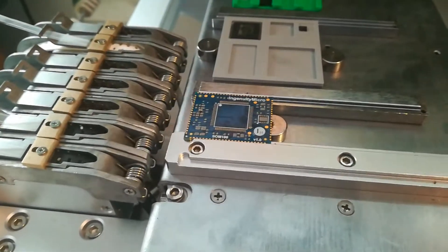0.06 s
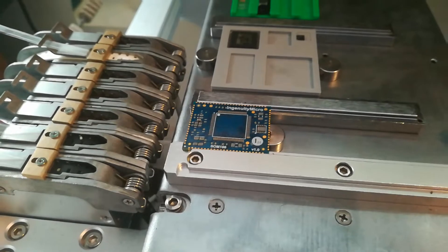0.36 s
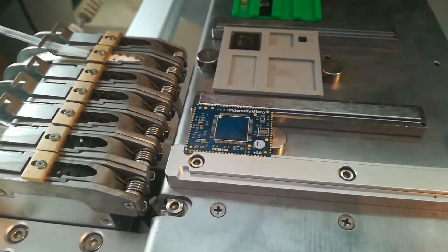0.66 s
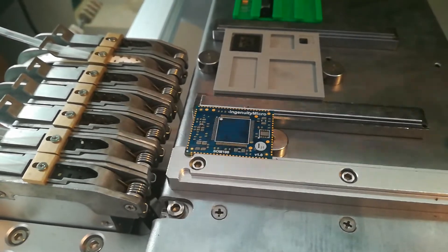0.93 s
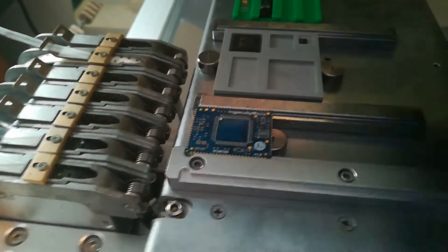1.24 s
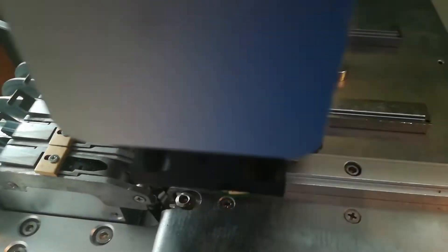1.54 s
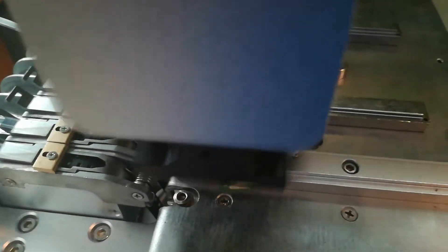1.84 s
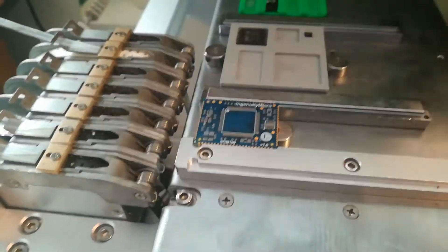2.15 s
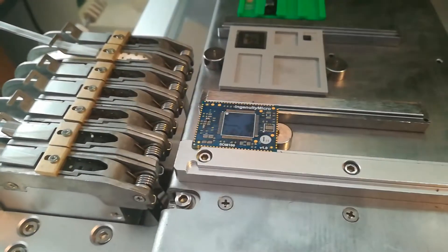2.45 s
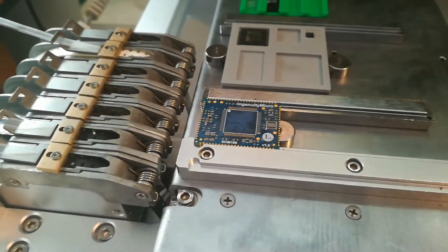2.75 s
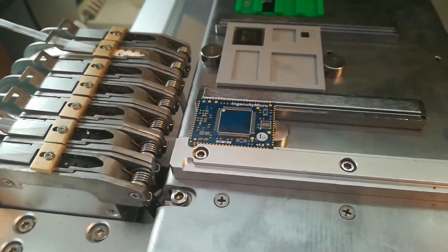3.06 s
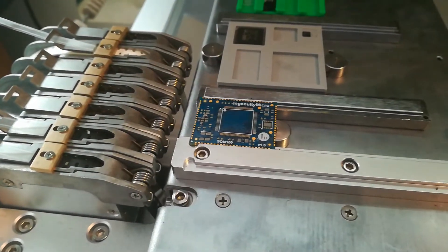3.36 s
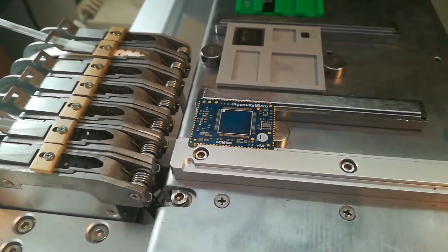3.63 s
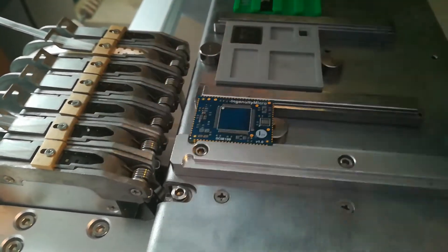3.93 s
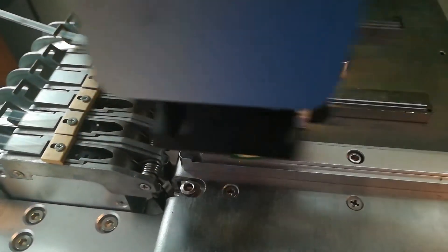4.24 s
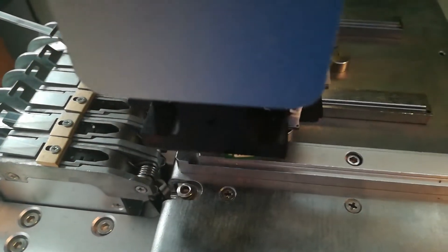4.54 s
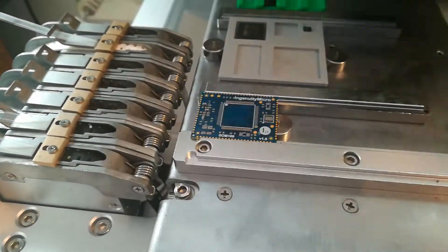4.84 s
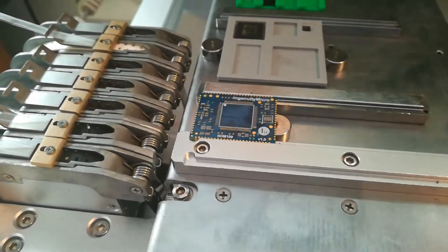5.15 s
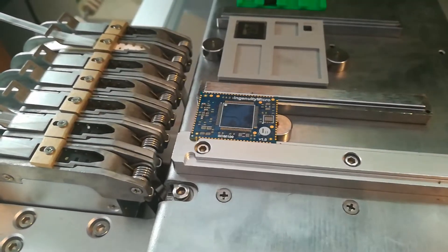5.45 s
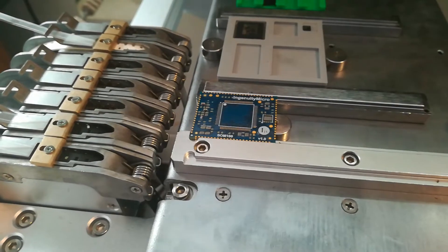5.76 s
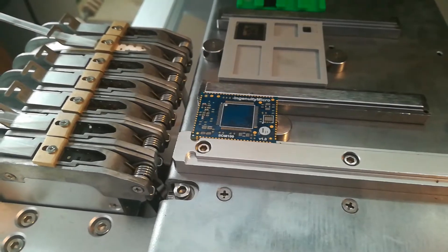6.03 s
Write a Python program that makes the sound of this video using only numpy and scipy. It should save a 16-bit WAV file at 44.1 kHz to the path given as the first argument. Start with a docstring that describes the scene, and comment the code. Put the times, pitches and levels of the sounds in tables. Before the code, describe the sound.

A pick-and-place machine works close to a stereo microphone in a workshop. Its belt drives whine up and down in pitch while bearings hiss along steel rails, and each start and stop gives a low, rattling shudder. Between moves come light metallic nozzle clicks and short, bright air valve snaps. The cycle of two longer moves and one short move plays twice over a quiet pump hum and fan noise.

```python
"""A workshop, with a stereo microphone close to a pick-and-place machine: fetch a part, carry it, return.
Belt drives whine up and down through the frame's resonances, bearings rush on the rails, and every
start and stop shudders the frame. Between moves the nozzle knocks and a vacuum valve snaps.
Behind the machine a pump hums throughout, over fan noise and a faint hiss from the air line."""
import sys
import numpy as np
from scipy import signal
from scipy.fft import rfft, irfft, next_fast_len
from scipy.io import wavfile
from scipy.ndimage import map_coordinates

SR = 44100
rng = np.random.default_rng(int(sys.argv[2]) if len(sys.argv) > 2 else 0)


def materialize(psi):
    """Save the field psi as 16-bit PCM at rate SR to the path in sys.argv[1].

    A 1-D psi becomes a single channel; in a 2-D psi each row is a channel.
    """
    bounded = np.clip(np.atleast_2d(psi).T, -1, 1)
    quanta = np.round(bounded * 32767).astype(np.int16)
    wavfile.write(sys.argv[1], SR, quanta)


N = 272979
T = np.arange(N) / SR

# The three moves. Each gives the Y stroke in seconds, then relative levels in dB: X whine and its
# octave, X and Y hiss, Y rumble, bench drone at launch and braking, Y whine, Y top treble.
FETCH = dict(y_s=.699, whine_db=-21, octave_db=-1.5, x_hiss_db=-33, y_hiss_db=-28.5, y_rumble_db=-39.5, launch_db=-32.5, brake_db=-41.5, y_whine_db=-34.5, y_sizzle_db=-1.2)
CARRY = dict(y_s=.707, whine_db=-21, octave_db=-0.5, x_hiss_db=-30, y_hiss_db=-30.5, y_rumble_db=-44, launch_db=-41, brake_db=-36.5, y_whine_db=-37, y_sizzle_db=-1.5)
RETURN = dict(y_s=.385, whine_db=-22, octave_db=0.5, x_hiss_db=-33, y_hiss_db=-33, y_rumble_db=-29, launch_db=-35, brake_db=-39.5, y_whine_db=-41.5, y_sizzle_db=-12)
# The machine's cycle. Each row: start in seconds, X stroke in seconds, move.
MOVES = [(-.051, .252, RETURN), (.77, .445, FETCH), (1.79, .526, CARRY), (2.7, .252, RETURN),
         (3.522, .432, FETCH), (4.546, .524, CARRY), (5.456, .252, RETURN)]
# How both axes speed up. Each row: seconds from rest, belt tooth tone in Hz.
SPEED_RAMP = [(0, 0), (.125, 1400), (.24, 2225.5)]
# Belt partials. Each row: multiple of the tooth tone, level in dB.
BELT_PARTIALS = [(.5, -6.5), (1, 0), (3, -6.5), (4, -15)]
# Each drive flares at one speed and thins near the top: tooth tone and width in Hz, flare and sag in dB.
X_FLARE, Y_FLARE = (1520, 140, 7, -3), (1130, 160, 11, -16)
# How the gantry radiates. Each row: frequency in Hz, gain in dB.
GANTRY_RESPONSE = [(100, -31), (200, -32), (270, -1.5), (420, -15), (700, -19.5), (900, -12), (1250, -17),
                   (1480, -6), (1750, -5.5), (1950, -10), (2150, -10.5), (2650, -11), (3100, -19),
                   (9000, -18)]
# Axis rumble, belt churn and bearing hiss. Each row: frequency in Hz, relative noise density in dB.
RUMBLE_SPECTRUM = [(30, -25), (110, -25), (175, -21), (220, -2.5), (275, 3.5), (345, -10.5), (410, -18),
                   (800, -32), (3000, -125)]
CHURN_SPECTRUM = [(250, -43), (420, -5), (520, -2), (700, 0.5), (860, 1), (1200, 3.5), (1650, 3),
                  (2100, -5.5), (2500, -17), (3300, -10.5), (6000, -55), (12000, -110)]
BEARING_SPECTRUM = [(1290, -27), (2200, -4), (2390, -7.5), (2920, -9.5), (3220, -7.5), (3740, -13),
                    (4760, -10), (5960, -4.5), (6420, -10.5), (8800, -16), (11600, -16.5), (12500, -15),
                    (13700, -17.5), (14800, -18.5), (16000, -21)]
# Steel rail modes. Each row: frequency in Hz, phase wobbles per second, level in dB.
RAIL_MODES = [(6122, 14, 0), (7795, 90, -20), (9458, 14, -15), (12242, 90, -19), (12650, 500, -13),
              (14373, 16, -11), (14500, 400, -15)]
# A shudder's shape: glide in Hz per second, swell and fall in seconds, chatter over the rattle in dB.
LAUNCH, HALT = (1100, .011, .0075, 0), (-900, .019, .014, -12)
# Frame shudders. Each row: peak time in seconds, level in dB, pitch in Hz, belt slap in dB,
# rattle in dB, shape.
SHUDDERS = [(.201, -13, 262, -25.5, -25.5, HALT), (.8, -12.5, 280, -23, -31.5, LAUNCH),
            (1.23, -10, 249.6, -33, -47, HALT), (1.481, -16, 235, -39, -41, HALT),
            (1.815, -6.5, 253.5, -28.5, -27.5, LAUNCH), (2.316, -12.5, 280, -22.5, -24.5, HALT),
            (2.724, -8.5, 276, -23, -27, LAUNCH), (2.945, -13, 267, -23, -24.5, HALT),
            (3.549, -13.5, 278, -20, -37, LAUNCH), (3.968, -11.5, 257.5, -31, -48, HALT),
            (4.219, -18, 239, -39, -40, HALT), (4.572, -7.5, 255, -28, -27, LAUNCH),
            (5.058, -11, 281, -21, -26, HALT), (5.48, -11.5, 280, -22.5, -25.5, LAUNCH),
            (5.703, -12.5, 263, -24.5, -26.5, HALT)]
# Light metal clicks: nozzle knocks at the head, brake clicks as strokes end, ticks as drives start. Each row:
# start in seconds, relative level in dB, body offset in dB.
KNOCKS = [(0.18, -23, -7), (.417, -39, -12), (0.77, -37, 13.5), (1.467, -26.5, -1), (1.602, -43, 6),
          (1.638, -11.5, -15), (1.646, -23, -9), (1.732, -16.5, -8), (1.742, -21, -9),
          (1.772, -18.5, -9), (2.932, -35, -4), (3.52, -31.5, 9), (4.358, -43, -11), (4.39, -22, -4),
          (4.489, -15.5, -7), (4.496, -28, -3), (4.527, -23.5, -4), (5.688, -27, -8)]
# Runs of the nozzle motor. Each entry: start in seconds.
LIFT_STARTS = [1.461, 2.942, 4.214, 5.7]
# Valve snaps. Each row: start in seconds, relative level in dB, left over right in dB.
VALVE_SNAPS = [(1.6633, -10, 9.5), (2.5706, -11, 4.5), (4.418, -11, 7), (5.3274, -10.5, 2.5)]
# Air drawn through the nozzle. Each row: peak time in seconds, level in dB, swell and fall in seconds.
SUCTION = [(.63, -46.5, .018), (1.625, -40.5, 0.031), (1.745, -39.5, 0.048), (2.59, -46, 0.21),
           (4.378, -40.5, 0.032), (4.5, -39, 0.045), (5.35, -44, 0.17)]
# Resonances of the placement head, valve body, sheet-metal covers and leaking air line.
# Each row: frequency in Hz, width in Hz, gain in dB.
HEAD_MODES = [(1080, 63, 1.5), (1655, 170, 3), (3110, 420, 7.5), (3850, 760, 2), (5560, 880, 0),
              (10240, 720, -7.5), (12700, 900, -8)]
VALVE_MODES = [(3180, 160, 6), (5060, 820, 2), (7500, 590, 8), (9500, 1800, -4.5), (14300, 4100, -6)]
COVER_MODES = [(515, 11, -1.5), (578, 5.7, 7.5), (858, 16, 7.5), (923, 71, -7), (1088, 41, 2),
               (1286, 16, 0.5), (1450, 49, -16.5), (1562, 27, -2.5), (1670, 72, -3), (1780, 17, 0.5),
               (1896, 107, 0.5), (2090, 25, 5)]
LEAK_MODES = [(8900, 170, 0), (5600, 1400, 2)]
# The pump's hum. Each row: frequency in Hz, relative level in dB.
PUMP_TONES = [(102.3, -56.5), (166.9, -60), (199.2, -76), (220.7, -43.5), (446.8, -66), (947.5, -61),
              (1615, -62), (2175, -63)]
# Fan noise in the workshop. Each row: frequency in Hz, relative noise density in dB.
FAN_SPECTRUM = [(15, -63.5), (25, -16.5), (105, -18.5), (185, -23), (223, -5), (249, -16), (363, -28.5),
                (439, -28.5), (775, -25), (962, -23.5), (1290, -30), (2110, -28.5), (3430, -34.5),
                (8140, -41), (16000, -66)]
# The enclosure's echo. Each row: frequency in Hz, seconds to fall by 60 dB.
ENCLOSURE_T60 = [(200, 0.14), (2000, 0.25), (12000, 0.046)]
# How alike noise is at the two microphones. Each row: frequency in Hz, correlation.
MIC_LIKENESS = [(100, 0.99), (300, 0.97), (700, 0.27), (1500, 0.22), (3000, 0.06), (6000, 0.065),
                (14000, 0.038)]
# Shading between the microphones. Each row: frequency in Hz, left over right in dB.
MIC_BALANCE = [(250, 0), (700, -3.5), (1500, -3), (2600, -0.5), (5000, 1), (9000, 5), (14000, 5)]
# Delay between the microphones. Each row: frequency in Hz, seconds by which the left is late.
MIC_DELAY = [(200, 0.000034), (400, 0.00036), (700, 0.00072), (3000, 0.000592)]


def belts(rough_db, phase_jitter, buzz_db, braking_db, octave_rise_db):
    """Up close, belt teeth whine at a pitch set by each axis' speed; the nozzle motor joins in."""
    whine = np.zeros(N)
    flutter = amp(rough_db * wobble(140))
    # chattering teeth break up the overtones
    buzz = 0.85 * unit(amp(buzz_db * wobble(260))) * np.exp(.35j * wobble(200))
    slip = phase_jitter * wobble(220)  # uneven teeth blur the tone
    for start, x_s, move in MOVES:
        x_axis = (x_s, move["whine_db"], move["octave_db"], X_FLARE)
        y_axis = (move["y_s"], move["y_whine_db"], -18, Y_FLARE)
        for length, whine_db, octave_db, (flare_hz, width_hz, flare_db, sag_db) in (x_axis, y_axis):
            on = (T > start) & (T < start + length)
            hz = tooth_hz(start, length)[on]
            # the braking half of a stroke is louder and brings out the octave
            braking = np.clip((T[on] - start - length / 2) / 0.043, 0, 1)
            sag = sag_db * (hz / SPEED_RAMP[-1][1]) ** 4
            level = amp(whine_db + braking_db * braking + sag) * flutter[on]
            flare = flare_db * np.exp(-((hz - flare_hz) / width_hz) ** 2)
            phase = 2 * np.pi * np.cumsum(hz) / SR + slip[on]
            for order, db in BELT_PARTIALS + [(2, octave_db + octave_rise_db * (braking - 1))]:
                tone = np.exp(1j * (order * phase + rng.uniform(0, 2 * np.pi)))
                if order >= 2:
                    tone *= buzz[on]
                gain = amp(db + flare * (order == 1) + along(GANTRY_RESPONSE, order * hz))
                whine[on] += level * gain * tone.real
    return amp(2) * filtered(np.sqrt(2) * (whine + flutter * nozzle_motor(slip)), microphones)


def bearings(y_rasp_db, x_sizzle_db, sing_db, sing_lag_s):
    """Ball bearings hiss with speed; the X carriage rings, and the rails sing while Y cruises."""
    power = np.zeros((3, N))  # rasp, hiss and sizzle
    cruise, x_power = np.zeros((2, N))
    for start, x_s, move in MOVES:
        y_speed = speed(start, move["y_s"])
        x_hiss = amp(move["x_hiss_db"]) ** 2 * speed(start, x_s) ** .35
        y_hiss = amp(move["y_hiss_db"]) ** 2 * y_speed ** 1.4
        power[0] += x_hiss + amp(y_rasp_db) ** 2 * y_hiss
        power[1] += x_hiss + y_hiss
        power[2] += amp(x_sizzle_db) ** 2 * x_hiss + amp(move["y_sizzle_db"]) ** 2 * y_hiss
        cruise += y_speed ** 12
        x_power += x_hiss
    chatter = swells([(s + 0.005, rattle_db + shape[-1], .007, .015)
                      for s, *_, rattle_db, shape in SHUDDERS])
    rasp, hiss, sizzle = np.hypot(lingering(power, lag_s=0.0029), chatter * amp([[-1], [1], [-7]]))
    balls = amp(0.6 * wobble(500) + 1.22 * wobble(40))  # balls drop into their return channels
    # the hiss drifts between two sets of rail resonances
    rail = lambda hz: colour(BEARING_SPECTRUM)(hz) * ripple(hz, depth_db=2.8, spacing_hz=110)
    first, second = noise(rail), noise(rail)
    drift = 1.65 * wobble(11)
    rush = amp(-0.33) * balls * (np.cos(drift) * first + np.sin(drift) * second)
    low = filtered(rush, colour([(4400, 0), (5500, -25)]))
    high = filtered(rush, colour([(7000, -30), (9000, 0)]))
    tones = sum(amp(db + 2.5 * wobble(14)) * np.sin(2 * np.pi * hz * T + .5 * wobble(rate))
                for hz, rate, db in RAIL_MODES)
    swell = lingering(cruise, lag_s=sing_lag_s) ** 3  # the rails take time to start singing
    song = amp(sing_db) * swell * filtered(tones, microphones)
    ring_level = amp(-13 + 2 * wobble(30)) * np.sqrt(x_power)
    ring = ring_level * noise(lambda hz: resonances([(12650, 550, 0)])(hz) ** 2)
    return ring + rasp * low + hiss * (rush - low - high + song) + sizzle * high


def rolling_axes(x_rumble_db, x_churn_db, y_churn_db, shaken_db, shaken_s):
    """Rumble and belt churn each grow as a power of the axis speeds; every shudder stirs them up."""
    rumble_power, churn_power = np.zeros((2, N))
    for start, x_s, move in MOVES:
        x, y = speed(start, x_s), speed(start, move["y_s"])
        rumble_power += amp(x_rumble_db) ** 2 * x ** .5 + amp(move["y_rumble_db"]) ** 2 * y ** 0.27
        churn_power += amp(x_churn_db) ** 2 * x ** 1.5 + amp(y_churn_db) ** 2 * y ** 1.17
    shaken = swells([(s, db + shaken_db, .012, .02) for s, db, *_ in SHUDDERS])
    slap = swells([(s, slap_db, .008, .014) for s, db, hz, slap_db, *_ in SHUDDERS])
    rumble_level = np.hypot(lingering(rumble_power, 0.0059), lingering(shaken ** 2, shaken_s))
    churn_level = np.hypot(lingering(churn_power + 0.73 * slap ** 2, lag_s=0.021), slap)
    rumble = rumble_level * noise(colour(RUMBLE_SPECTRUM))
    churn = amp(1.46 * wobble(180)) * noise(lambda hz: colour(CHURN_SPECTRUM)(hz) * covers(hz))
    return rumble + churn_level * churn


def frame_shudders(rattle_swell_s, rattle_fall_s):
    """At low speed the drive shakes the frame's main mode; at the peak loose parts rattle."""
    sway = np.zeros(N)
    for s, db, hz, _, _, (glide, swell, fall, _) in SHUDDERS:
        level = swells([(s, db, swell, fall)])
        on = level > 0
        t = T[on] - s
        sway[on] += level[on] * np.sin(2 * np.pi * (hz + glide * t / 2) * t + rng.uniform(0, 2 * np.pi))
    shake = swells([(s, rattle_db, rattle_swell_s, rattle_fall_s) for s, *_, rattle_db, _ in SHUDDERS])
    loose_parts = colour([(150, -35), (380, -26), (550, 10.5), (900, 11), (1700, -14.5), (2600, 1),
                          (4500, -1), (6800, 3.5), (8500, -13), (16000, -52)])
    rattle = noise(lambda hz: loose_parts(hz) * covers(hz))
    return filtered(sway, microphones) + shake * amp(1.1 * wobble(600)) * rattle


def knocks(t60):
    """Light metal contacts ring the placement head; its two lowest modes add a longer body."""
    ring = sum(amp(db) * (burst(s, t60) + 0.85 * burst(s, 0.016)) for s, db, _ in KNOCKS)
    body = sum(amp(db + body_db) * burst(s, 0.15) for s, db, body_db in KNOCKS)
    return amp(-9.5) * struck(ring, HEAD_MODES) + amp(-8) * struck(body, HEAD_MODES[:2])


def vacuum_valve(t60, tail_db):
    """The valve lets go a very short, bright puff; air hisses at the nozzle around it."""
    puff = sum(amp(db + pan * np.array([[.5], [-.5]])) * (burst(s, t60) + amp(tail_db) * burst(s, 0.043))
               for s, db, pan in VALVE_SNAPS)
    air = noise(colour([(1000, 0.5), (2500, -11), (6000, 0), (9000, -6), (13000, -14), (15500, -6)]))
    suction = swells([(s, db, width, width) for s, db, width in SUCTION])
    return amp(-3.5) * struck(puff, VALVE_MODES) + suction * air


def nozzle_motor(slip, run_s=.16, low_hz=1490, top_hz=1715):
    """The nozzle motor sings one small arch of pitch and level on each run."""
    arch = sum(np.sin(np.pi * np.clip((T - s) / run_s, 0, 1)) for s in LIFT_STARTS).clip(0)
    hz = low_hz + (top_hz - low_hz) * arch
    level = amp(-44 + along(GANTRY_RESPONSE, hz)) * np.sqrt(arch)
    return level * np.sin(2 * np.pi * np.cumsum(hz) / SR + slip)


def bench(ring_s):
    """Underneath, the bench drones with the gantry's weight shifts as the Y axis changes speed."""
    push = np.zeros(N)
    for start, _, move in MOVES:
        change = np.gradient(speed(start, move["y_s"])) * SR * SPEED_RAMP[-1][0]
        push += (change * np.where(change > 0, amp(move["launch_db"]), amp(move["brake_db"]))) ** 2
    drone = noise(resonances([(66.6, 17, -4.5), (97.1, 9.6, 3), (134.7, 13, -2)]))
    return amp(-5.5) * lingering(push, lag_s=ring_s) * filtered(drone, colour([(160, 0.5), (300, -25)]))


def workshop():
    """In the background a pump hums unsteadily over fan noise and a faint hiss from the air line."""
    hum = sum(amp(db + 0.42 * wobble(8.1)) * np.sin(2 * np.pi * hz * T + 0.31 * wobble(12))
              for hz, db in PUMP_TONES)
    fan = amp(-44) * noise(colour(FAN_SPECTRUM))
    leak = amp(-57) * noise(resonances(LEAK_MODES))
    return amp(0.5) * hum + fan + leak


def covers(hz):
    """The sheet-metal covers add their narrow resonances to the direct sound."""
    return 1 + sum(resonance(hz, *mode) for mode in COVER_MODES)


def enclosure(x):
    """The enclosure's diffuse answer, different at each microphone."""
    hz, t, spectrum = signal.stft(rng.standard_normal((2, SR // 3)), SR, nperseg=256)
    decay = amp(-60 * t / along(ENCLOSURE_T60, hz)[:, None])
    tail = signal.istft(spectrum * decay, SR, nperseg=256)[1]
    delayed = np.pad(x, ((0, 0), (130, 0)))  # about 3 ms
    return signal.fftconvolve(delayed, tail / np.linalg.norm(tail[0]), axes=1)[:, :N]


def microphones(hz):
    """The machine reaches the two microphones with different delay and shading."""
    side = np.array([[.5], [-.5]])
    return amp(side * along(MIC_BALANCE, hz)) * np.exp(-2j * np.pi * side * hz * along(MIC_DELAY, hz))


def tooth_hz(start, length):
    """Belt tooth tone of one stroke: ramp up, cruise if there is time, ramp down."""
    from_rest_s = np.minimum(T - start, start + length - T)
    return np.interp(from_rest_s, *np.transpose(SPEED_RAMP))


def speed(start, length):
    """Speed of one stroke as a share of the top speed."""
    return tooth_hz(start, length) / SPEED_RAMP[-1][1]


def noise(response):
    """Stereo noise, alike in the bass and diffuse in the treble, with a centre of rms 1."""
    def mid_and_side(hz):
        turn = np.arccos(np.clip(along(MIC_LIKENESS, hz), -1, 1)) / 2
        return response(hz) * np.array([np.cos(turn), np.sin(turn)])
    mid, side = filtered(rng.standard_normal((2, N)), mid_and_side)
    pair = filtered(np.array([mid + side, mid - side]), microphones)
    return pair / np.std(pair.mean(axis=0))


def struck(envelope, modes):
    """A noisy contact rings the modes; the envelope gives its rms."""
    response = resonances(modes)
    gain = np.sqrt(np.mean(abs(response(np.linspace(0, SR / 2, 4096))) ** 2))
    return filtered(envelope * rng.standard_normal((2, N)), response) / gain


def resonance(hz, centre, width, db):
    """The band-pass response of one mode."""
    return amp(db) * 1j * hz * width / (centre ** 2 - hz ** 2 + 1j * hz * width)


def resonances(modes):
    """The response of several modes, alternating in sign."""
    return lambda hz: sum((-1) ** k * resonance(hz, *mode) for k, mode in enumerate(modes))


def ripple(hz, depth_db, spacing_hz):
    """The response of countless small metal modes: random peaks and dips."""
    return amp(depth_db * map_coordinates(rng.standard_normal(4096), [hz / spacing_hz], mode="wrap"))


def swells(rows):
    """Rounded peaks. Each row: peak time in seconds, level in dB, swell and fall in seconds."""
    envelope = np.zeros(N)
    for s, db, swell, fall in rows:
        on = slice(*np.searchsorted(T, [s - 4 * swell, s + 4 * fall]))
        t = T[on] - s
        envelope[on] += amp(db) * np.exp(-abs(t / np.where(t < 0, swell, fall)) ** 1.42)
    return envelope


def burst(start, t60):
    """A sudden onset that dies away."""
    return (T >= start) * amp(-60 * np.clip(T - start, 0, 2 * t60) / t60)


def lingering(power, lag_s):
    """The rms level of something that stores the power fed to it and lets it go slowly."""
    keep = np.exp(-1 / (lag_s * SR))
    return np.sqrt(signal.lfilter([1 - keep], [1, -keep], power + 1e-14))


def wobble(rate):
    """A smooth random curve, rate knots a second."""
    return map_coordinates(rng.standard_normal(int(N * rate / SR) + 4), [T * rate], mode="nearest")


def filtered(x, response):
    """x through a complex frequency response."""
    size = next_fast_len(N + 8192)
    return irfft(rfft(x, size) * response(np.fft.rfftfreq(size, 1 / SR)), size)[..., :N]


def colour(points):
    """The response of a (Hz, dB) spectrum."""
    return lambda hz: amp(along(points, hz))


def along(points, hz):
    """(Hz, value) points read on a log axis."""
    knots_hz, values = np.transpose(points)
    return np.interp(np.log(hz + 1), np.log(knots_hz + 1), values)


def amp(db):
    """Decibels to gain."""
    return 10 ** (np.asarray(db) / 20)


def unit(x):
    """Scale to rms 1."""
    return x / np.sqrt(np.mean(x ** 2) + 1e-20)


def scene():
    """The machine close to the microphones, the workshop behind it."""
    drives = belts(rough_db=2.5, phase_jitter=0.3, buzz_db=-1, braking_db=1.5, octave_rise_db=4)
    whine = filtered(drives, covers)
    clicks = knocks(t60=0.066) + vacuum_valve(t60=0.02, tail_db=-18)
    echo = enclosure(amp(-5) * whine + amp(-14) * clicks)
    rolling = rolling_axes(x_rumble_db=-30, x_churn_db=-29.5, y_churn_db=-38,
                           shaken_db=-10, shaken_s=0.045)
    frame = frame_shudders(rattle_swell_s=0.014, rattle_fall_s=0.02) + bench(ring_s=0.068)
    rails = bearings(y_rasp_db=-3, x_sizzle_db=-2, sing_db=-1, sing_lag_s=.04)
    return whine + clicks + echo + rolling + rails + frame + workshop()


def record(dry):
    """The microphone signal clips at full scale and keeps nothing above 15.9 kHz."""
    return filtered(np.clip(dry, -1, 1), lambda hz: hz < 15900)


dry = scene()
out = record(dry)
materialize(out)
```